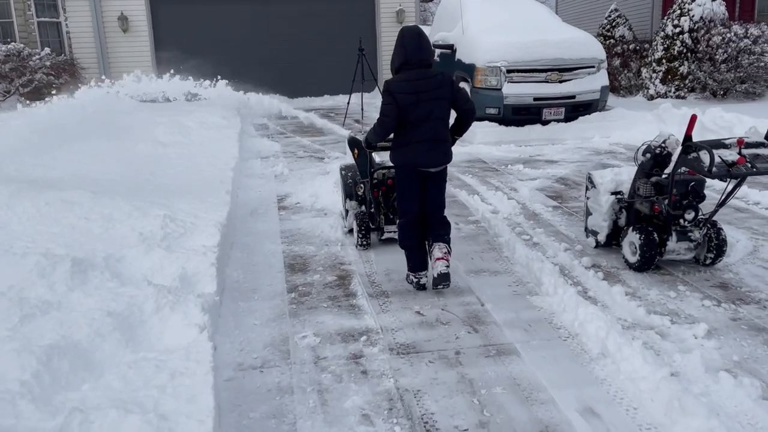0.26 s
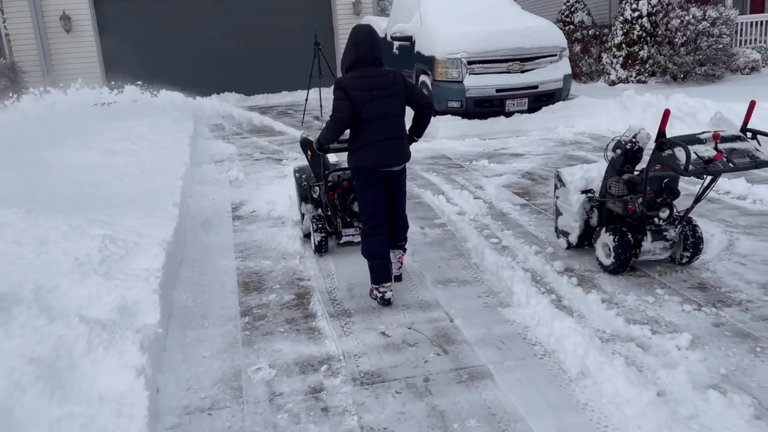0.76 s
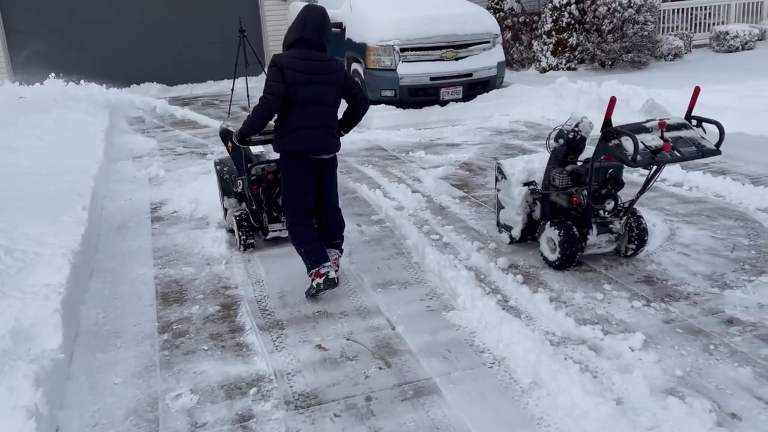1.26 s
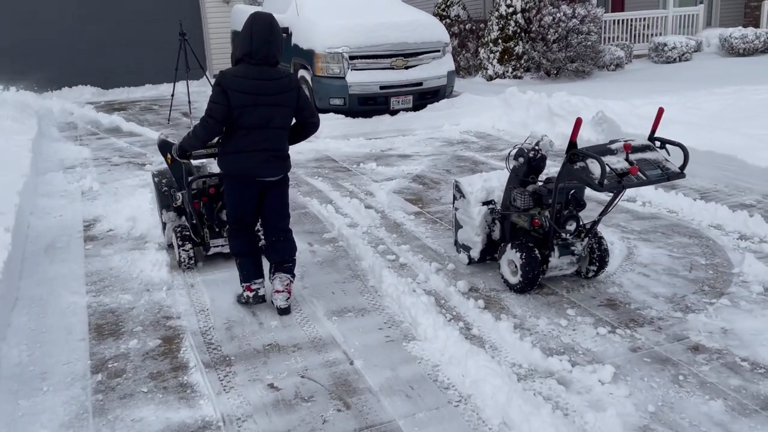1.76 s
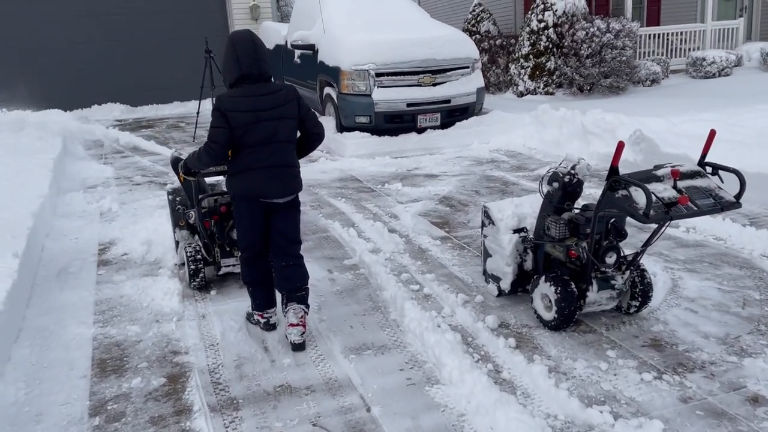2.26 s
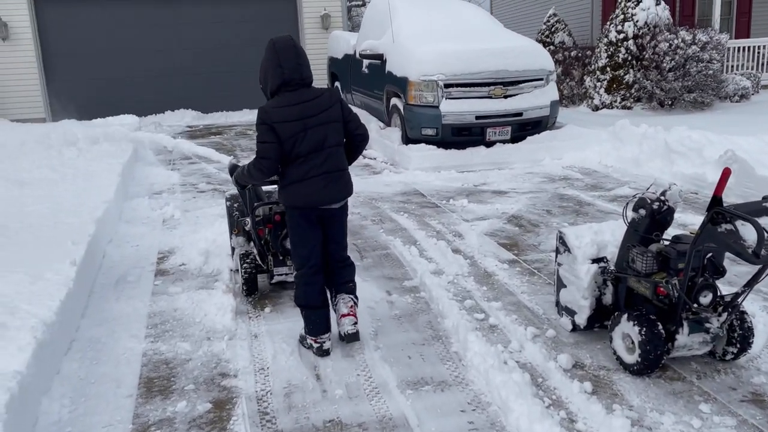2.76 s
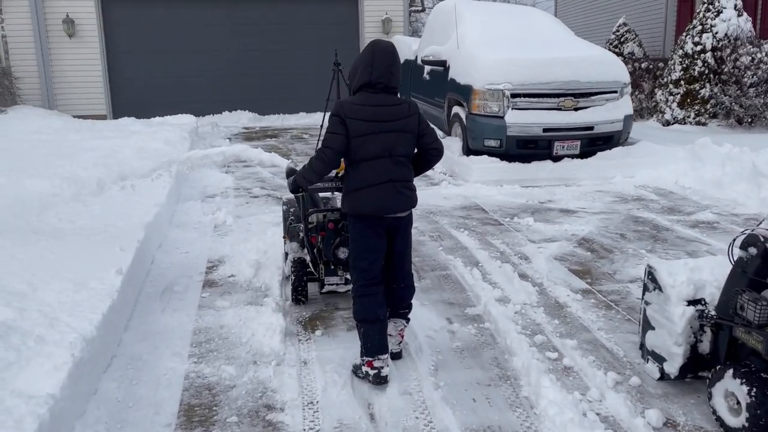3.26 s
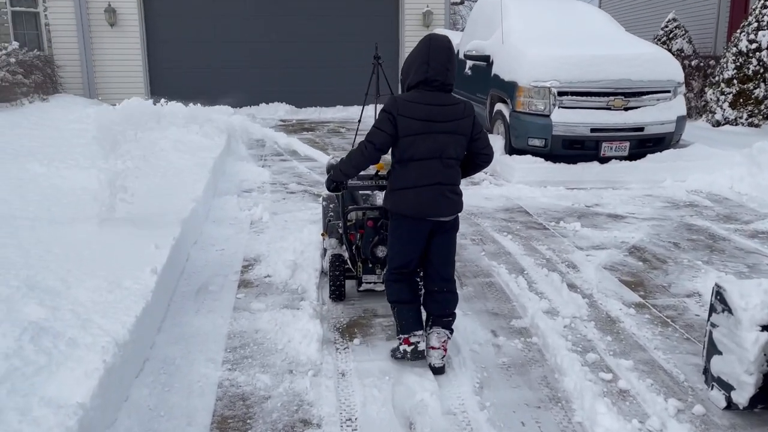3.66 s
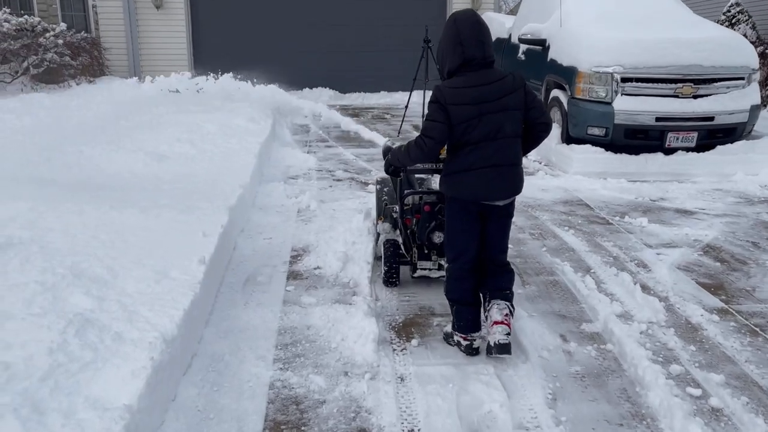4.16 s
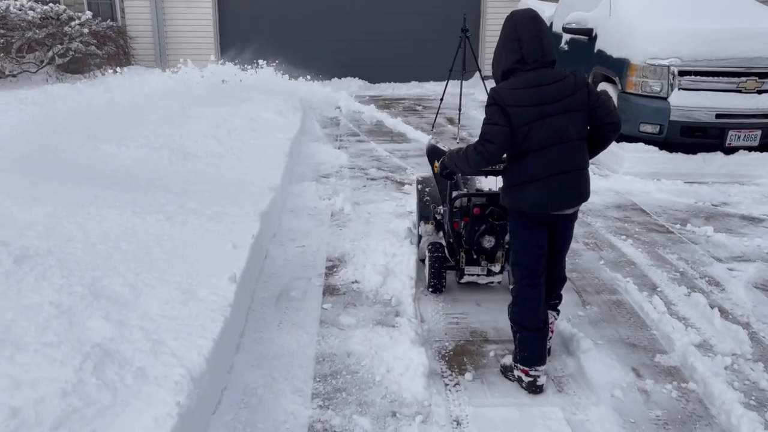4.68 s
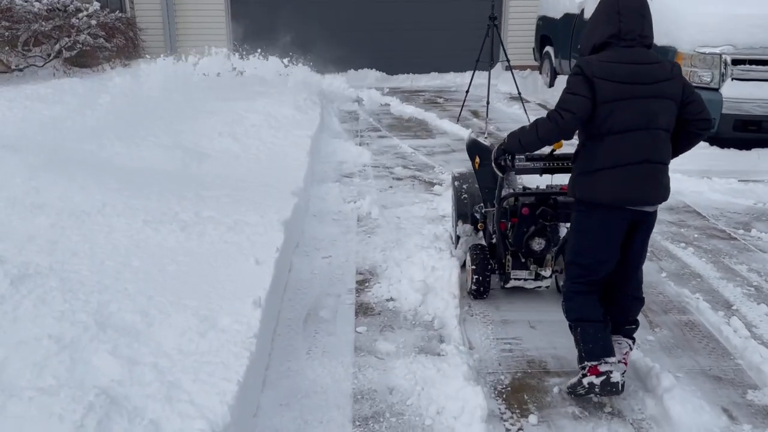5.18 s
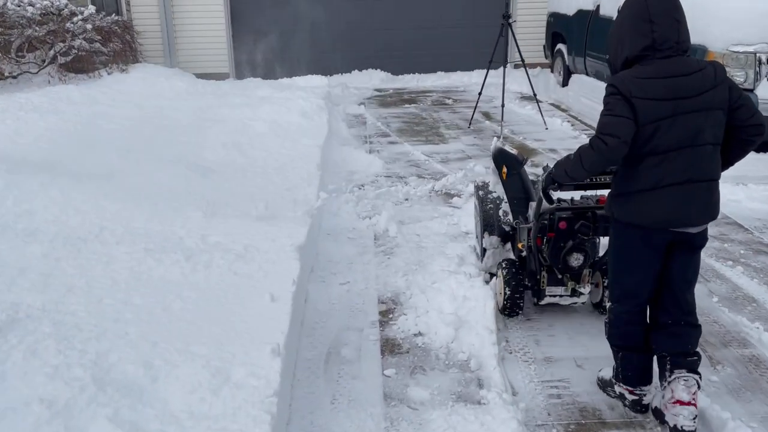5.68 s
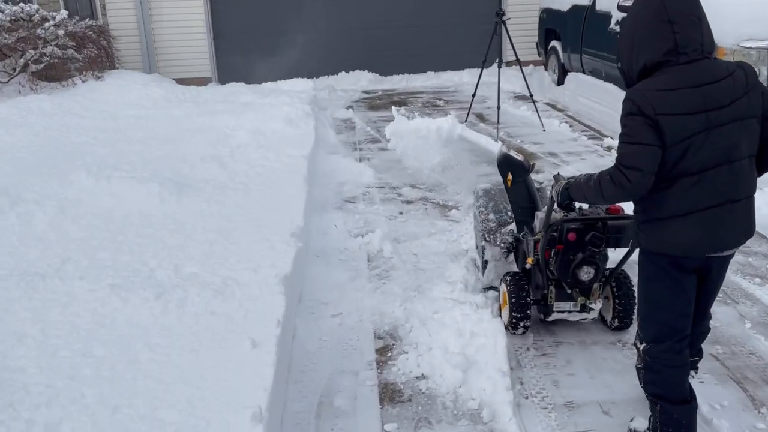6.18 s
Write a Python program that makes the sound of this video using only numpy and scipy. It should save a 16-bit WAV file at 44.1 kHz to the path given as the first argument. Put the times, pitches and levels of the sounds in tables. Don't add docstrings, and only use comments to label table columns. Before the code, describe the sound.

Outdoors on a snowy concrete driveway, a single-cylinder snow blower works a few metres ahead of a moving handheld stereo microphone. From 0 s the engine putters at about 28 firings a second: a low buzzing muffler hum over rumble, with rapid metallic rattling, ringing covers and a hissy spit each cycle. A small ping opens it; light high ticking swells around 0.6, 2.1 and 4.5 s. From 1.9 to 3.3 s the housing knocks hollowly on the concrete in a quick run of clanks. Speed rises slightly to 3 s, then dips at 3.5 s and eases. Single clanks come at 4.2 and 4.65 s as the sound turns brighter and closer. It revs up at 5.4 s, then from 5.6 s deep snow chokes it: heavy thumps, a hard clank, irregular misfires and sagging pitch until 6.1 s. Strong regular spits and faint pings follow as it pulls through, still running at 6.4 s.

```python
import sys
import numpy as np
from scipy import signal
from scipy.fft import rfft, irfft
from scipy.io import wavfile
from scipy.ndimage import uniform_filter1d

SR = 44100
rng = np.random.default_rng(int(sys.argv[2]) if len(sys.argv) > 2 else 0)


def store_pcm(level_fs):
    pcm = np.round(np.clip(level_fs, -1, 1) * 32767).astype(np.int16)
    wavfile.write(sys.argv[1], SR, np.atleast_2d(pcm).T)


def boost_factor(decibels):
    exponent = np.asarray(decibels, float) / 20
    return 10 ** exponent


N = 283563
T = np.arange(N) / SR
HZ = np.fft.rfftfreq(N, 1 / SR)
USUAL_RATE = 28.7

# time in seconds, firings per second.
SPEED = [(0.0, 27.7), (0.09, 28.27), (0.7, 28.82), (1.52, 28.4), (2.04, 28.75), (2.77, 29.57),
         (3.07, 29.69), (3.54, 27.63), (3.85, 27.68), (4.28, 28.68), (4.61, 29.07), (5.04, 29.25),
         (5.42, 31.2), (5.64, 30.1), (5.95, 25.2), (6.1, 24.75), (6.22, 26.75), (6.43, 28.2)]
# time in seconds, level in dB.
EFFORT = [(0, -1.5), (.6, .5), (1.3, -0.5), (2.1, 0), (3.0, -0.5), (3.3, -.5), (3.65, -2), (4.0, -2),
          (4.5, 1.07), (5.0, .5), (5.5, 0.5), (5.8, -0.15), (5.97, -2.5), (6.15, -1), (6.43, 1)]
# time in seconds, degree from 0 to 1.
STUMBLE = [(0, .05), (5.58, .08), (5.65, .7), (5.8, .4), (5.95, .85), (6.04, .2), (6.43, .1)]
# order, level in dB, dB per firing/s of speed,
# dB lost per squared firing/s of speed offset.
STRONG_ORDERS = [(2, -27, 1.26, -0.59), (4, -18, 1.24, 0.3743), (5, -23, -0.38, -0.11),
                 (8, -22.5, -0.55, 1.68)]
# order, level in dB.
WEAK_ORDERS = [(1, -49.5), (3, -38), (6, -38), (7, -39), (9, -40), (10, -32), (11, -36), (12, -43)]
# order, level in dB.
COWLING_ORDERS = [(16, -45), (18, -42), (19, -38), (28, -41), (29, -36), (30, -37), (32, -38), (34, -38),
                  (36, -36.5)]
# frequency in Hz, density in dB per Hz.
RUMBLE_COLOUR = [(20, -24), (40, -27.5), (58, -3), (85, 1), (115, -4), (190, 2.5), (330, -7), (450, -28)]
# lower edge in Hz, upper edge in Hz.
PART_BANDS = [(330, 1250), (1250, 2750), (2750, 4500), (4500, 15700)]
# level in dB, share of effort followed, dB gained after the swing.
PART_LEVELS = [(-25.5, 1.36, -0.45), (-28.5, 1.61, 2), (-32.5, 0.31, -4), (-26, 1.44, -0.85)]
PART_REPEATS = [.6, .7, .5, 0]
# place in cycles, decay in cycles,
# level in dB over the steady rattle, scatter in dB.
PART_BLOWS = [
    [(.05, .045, 8, 2), (.22, .05, 1, 3), (.69, .07, 1, 3)],
    [(.02, .06, 2, 2), (.565, .12, 2.5, 2), (.72, .12, 1, 2)],
    [(.02, .12, -1, 2), (.6, .06, 5, 3), (.72, .1, 6.5, 2)],
    [(.95, .17, 2.5, 2), (.38, .1, -1, 2), (.58, .1, 3, 3), (.73, .09, 10, 2.5)],
]
# frequency in Hz, density in dB per Hz.
RATTLE_COLOUR = [(300, -11), (420, -8), (830, -2), (1200, -12.5), (1550, -7.5), (2000, -11.5),
                 (2900, -11.5), (3400, -5.5), (4400, -10), (6400, -13.5), (7500, -10.5), (10000, -7.5),
                 (13000, -43), (15700, -28.5)]
# time in seconds, peak in dB.
MISFIRES = [
    (5.6339, -9),
    (5.6645, -15),
    (5.8421, -16),
    (5.921, -13.5),
    (5.9588, -14),
    (5.9912, -8),
    (6.033, -12.5),
]
# time in seconds, peak in dB.
LABOUR = [(0, -60), (6.045, -60), (6.06, -20), (6.2, -6.5), (6.31, -7), (6.43, -15)]
# time in seconds, peak in dB, frequency in Hz.
PINGS = [
    (0.0568, -15, 3630),
    (6.0731, -17.5, 3490),
    (6.112, -24.5, 3340),
    (6.1908, -17, 3487),
    (6.2644, -23.5, 3500),
    (6.4118, -26, 3530),
]
# middle in seconds, half length in seconds, dB over usual.
TAPPET_SPELLS = [(.62, 0.75, 15.7), (2.1, 0.78, 16.2), (4.55, 0.36, 22)]
# time in seconds, peak in dB, frequency in Hz.
THUMPS = [
    (1.46, -23, 80),
    (2.071, -20.5, 75),
    (5.646, -7.5, 86.05),
    (5.771, -11.5, 79),
    (5.921, -9, 74.4),
]
# time in seconds, peak in dB, ring in Hz, length in seconds.
CLANKS = [(1.91, -18, 765, .03), (2.13, -16, 790, .03), (2.245, -12, 765, .022), (2.375, -12, 740, .028),
          (2.478, -13, 760, .025), (2.515, -14, 740, .025), (2.625, -11, 770, .04), (2.775, -16, 625, .027),
          (2.935, -13, 630, .025), (2.961, -13, 670, .025), (3.103, -12, 790, .033),
          (3.125, -15, 740, .019), (3.255, -15, 805, .024), (4.22, -19, 860, .03), (4.655, -14, 770, .026),
          (5.629, -12.5, 700, .006), (5.661, -12, 600, .006), (5.722, -6, 780, .024),
          (5.883, -14, 820, .018)]
# frequency in Hz, width in Hz, level in dB.
COVER_MODES = [(508, 29, -19), (891.2, 49.6, -7.5), (1026.1, 23.8, -4), (1361.5, 21.4, 0.5), (1555, 35, -2),
               (1686, 72, -8.5)]
# time in seconds, level in dB.
NEARNESS = [(0, 2), (1, -2.5), (4, -2.5), (4.8, 3), (5.8, 4.5), (6.43, 0)]
# time in seconds, frequency in Hz.
ECHO_NOTCH = [(0, 4752), (1, 4650), (1.8, 4013), (2.5, 4520), (3.2, 4740), (4.4, 4910), (5, 3120),
              (5.6, 3030), (6.43, 2996)]
# frequency in Hz, lead of the left in radians.
STEREO_TWIST = [(2000, 0), (2500, .75), (3500, 1.1), (3900, .7), (4650, 2.45), (5340, 5.3), (5700, 6.2),
                (6100, 6.3), (8950, 9.42), (9250, 9.43), (11300, 11.4), (11900, 12.56), (13700, 12.57),
                (15300, 15.7)]
# frequency in Hz, likeness from 0 to 1.
STEREO_LIKENESS = [(30, .9998), (120, .9995), (350, .99), (600, 1), (2000, 1), (3200, .88), (4200, .45),
                   (5200, .85), (5900, .99), (6500, .88), (8900, 1), (9300, 1), (10300, .93), (11400, .7),
                   (12000, .99)]
# frequency in Hz, left over right in dB.
STEREO_LEAN = [(200, .1), (450, .5), (800, 2.8), (1500, .1), (2000, 0), (2450, -1), (3100, 0), (3600, 3),
               (4100, 0), (4900, -1.8), (5500, .7), (6000, 0)]


def evened(x):
    return x / np.sqrt(np.mean(x ** 2) + 1e-20)


def spectrum(points, hz):
    f, value = np.transpose(points)
    return np.interp(np.log(hz + 1), np.log(f + 1), value)


def course(points):
    return np.interp(T, *np.transpose(points))


def speed_offset():
    return course(SPEED) - USUAL_RATE


def add(mix, s, sound):
    part = mix[round(s * SR):][:len(sound)]
    part += sound[:len(part)]


def slow(hz):
    return evened(irfft(rfft(rng.standard_normal(N)) * np.exp(-(HZ / hz) ** 2) * (HZ > 0), N))


def resonate(x, hz, width):
    turn = np.exp(2j * np.pi * np.cumsum(hz * np.ones(len(x))) / SR)
    r = np.exp(-np.pi * width / SR)
    return 2 * (turn * signal.lfilter([1 - r], [1, -r], x / turn)).real


def strikes(turns, place, decay, scatter_db):
    cycle = np.floor(turns - place + 1).astype(int)
    size, late = rng.standard_normal((400, 2)).T
    since = np.maximum((turns - place) % 1 - .009 * (2 + late[cycle]), 0)
    strength = boost_factor(scatter_db * np.clip(size[cycle], -2, 1.6))
    return strength * (1 - np.exp(-since / .004)) * np.exp(-since / decay)


def repeating(turns, hold):
    patterns = rng.standard_normal((80, 1500))
    step = turns / hold
    first, blend = step.astype(int), step % 1 * np.pi / 2
    at = (turns % 1 * patterns.shape[1]).astype(int)
    return patterns[first, at] * np.cos(blend) + patterns[first + 1, at] * np.sin(blend)


def load_db():
    return -3 - 3 * np.clip(speed_offset(), -1.0, 2.2) - 24.0 * course(STUMBLE)


def swing():
    return np.clip((T - 4.65) / .01, 0, 1)


def muffler(turns):
    off, stumble = speed_offset(), course(STUMBLE)
    common_db = .286 * course(EFFORT) - 2.5 * stumble
    fade_db = common_db - .82 * np.maximum(off, 0) ** 2 - 2.1 * swing()
    mistiming = slow(hz=15.3)
    lines = []  # order, dB, waver in dB
    for k, db, slope, bend in STRONG_ORDERS:
        lines.append((k, db + slope * off - bend * off ** 2 + common_db, .6))
    for k, db in WEAK_ORDERS:
        lines.append((k, db + fade_db, 3.0))

    out = np.zeros(N)
    for k, db, waver_db in lines:
        angle = 2 * np.pi * k * (turns - .46 * (k % 2)) + .072 * waver_db * slow(hz=8.6)
        angle += .1496 * k * stumble * mistiming
        level_db = db + (waver_db + 2.5 * stumble) * np.clip(slow(hz=5.34), -2, 1)
        out += np.sqrt(2) * boost_factor(level_db) * np.cos(angle)
    for k, db in COWLING_ORDERS:
        angle = 2 * np.pi * k * (turns - .1) + .5 * slow(hz=3)
        level_db = db + .5 * fade_db - 12 * stumble + 2 * np.clip(slow(hz=2), -2, 1)
        out += np.sqrt(2) * boost_factor(level_db) * np.cos(angle)
    return out


def rumble():
    noise = irfft(rfft(rng.standard_normal(N)) * boost_factor(spectrum(RUMBLE_COLOUR, HZ)) * (HZ < 450), N)
    return boost_factor(-29.5 + .356 * slow(hz=5.1) + 4.07 * course(STUMBLE)) * evened(noise)


def rattle(turns):
    out, load = np.zeros(N), boost_factor(1.5 + .4 * load_db())
    parts = zip(PART_BLOWS, PART_BANDS, PART_REPEATS, PART_LEVELS)
    for blows, (lo, hi), repeats, (db, follow, swing_db) in parts:
        jumps = np.zeros(N)
        for at, decay, blow_db, scatter_db in blows:
            jumps += boost_factor(blow_db) * strikes(turns, at, decay, .6 * scatter_db)
        drive = 1 + load * jumps
        drive = drive / np.sqrt(uniform_filter1d(drive ** 2, size=8000)) * boost_factor(.6 * slow(hz=40))
        share = repeats * (1 - .754 * np.clip(course(STUMBLE), 0, 1))
        noise = np.sqrt(share) * repeating(turns, hold=14)
        noise += np.sqrt(1 - share) * rng.standard_normal(N)
        band = 1 / np.sqrt((1 + (lo / (HZ + 1)) ** 16) * (1 + (HZ / hi) ** 16))
        part = irfft(rfft(drive * noise) * band * boost_factor(spectrum(RATTLE_COLOUR, HZ)), N)
        out += boost_factor(db + follow * course(EFFORT) + swing_db * swing()) * evened(part)
    return out


def firing_knock(turns):
    knock = resonate(np.gradient(np.floor(turns - .11)), 513, 290)
    return boost_factor(-37.5 + 4.7 * swing()) * evened(knock)


def head_clack(turns):
    impacts = rng.standard_normal(N) * strikes(turns, .62, .1, 2.1)
    clack = resonate(resonate(impacts, 3400, 300), 3400, 500)
    return boost_factor(-37.5 + .367 * load_db()) * evened(clack)


def exhaust_spit(turns):
    puffs = boost_factor(-10.5 + .367 * load_db()) * strikes(turns, .6, .084, 1.13)
    pulls = T[1:][np.diff(np.floor(turns - .725)) > 0]
    labour = [(s, np.interp(s, *np.transpose(LABOUR))) for s in pulls]
    t = np.arange(0, .03, 1 / SR)
    for s, db in list(MISFIRES) + labour:
        add(puffs, s, boost_factor(db + 5) * (1 - np.exp(-t / .0004)) * np.exp(-t / .003))
    spit = resonate(resonate(rng.standard_normal(N) * puffs, 8860, 4800), 8860, 4800)
    return signal.sosfilt(signal.butter(3, 10500, fs=SR, output="sos"), spit)


def loose_cover():
    out, t = np.zeros(N), np.arange(0, .25, 1 / SR)
    for s, db, hz in PINGS:
        add(out, s, boost_factor(db) * np.sin(2 * np.pi * hz * t) * (t / .001076) * np.exp(1 - t / .0013))
    return out


def tappet_tick(turns):
    level_db = -50 + sum(db * np.exp(-((T - s) / half) ** 2) for s, half, db in TAPPET_SPELLS)
    gate = uniform_filter1d(strikes(turns, .57, .05, 4.0), size=60)
    return boost_factor(level_db) * evened(np.sin(2 * np.pi * 7100 * T + 3 * slow(hz=40)) * gate)


def frame_thump():
    out, t = np.zeros(N), np.arange(0, .25, 1 / SR)
    for s, db, hz in THUMPS:
        add(out, s - .01, boost_factor(db) * np.sin(2 * np.pi * hz * t) * (t / .0269) * np.exp(1 - t / .01396))
    return out


def housing_clank():
    out, t = np.zeros(N), np.arange(0, .25, 1 / SR)
    for s, db, hz, length in CLANKS:
        gap, again = rng.random(2)
        skips = np.gradient(np.floor(t / (.013 + .004 * gap) + .8)) * (1 + .27 * again)
        grind = .04 * rng.standard_normal(len(t))
        force = (skips + grind) * np.exp(-(t / length) ** 2) * (1 - np.exp(-t / .0013))
        ring = resonate(resonate(force, hz, 70), hz, 350)
        ring += .28 * resonate(resonate(force, 1550, 60), 1500, 500)
        ring += .25 * boost_factor(2 * (db + 6)) * resonate(resonate(force, 1700, 1300), 1700, 1300)
        add(out, s, boost_factor(db + 2) * ring / abs(ring).max())
    return out


def through_air(bright):
    bright = bright + sum(boost_factor(db) * resonate(bright, hz, width) for hz, width, db in COVER_MODES)
    top = irfft(rfft(bright) * (HZ > 11500), N)
    bright = bright + (boost_factor(course(NEARNESS)) - 1) * top
    return bright - .53 * resonate(bright, course(ECHO_NOTCH), 703)


def scene():
    turns = .19 + np.cumsum(course(SPEED)) / SR
    bright = rattle(turns) + firing_knock(turns) + head_clack(turns)
    bright += exhaust_spit(turns) + tappet_tick(turns)
    mono = muffler(turns) + rumble() + through_air(bright)
    mono += loose_cover() + frame_thump() + housing_clank()
    return np.array([mono, mono])


def band_limit(x):
    return signal.sosfilt(signal.butter(12, 15730, fs=SR, output="sos"), x)


def record(dry):
    blur = evened(uniform_filter1d(rng.standard_normal(len(HZ)), size=60))
    spread = np.sqrt(-2 * np.log(np.clip(spectrum(STEREO_LIKENESS, HZ), .1, 1)))
    twist = np.exp(-1j * (np.interp(HZ, *np.transpose(STEREO_TWIST)) + spread * blur))
    lean = boost_factor(spectrum(STEREO_LEAN, HZ) / 2)
    left, right = rfft(dry) * (HZ < 15750)
    mix = irfft([left * lean, right * twist / lean], N)
    return band_limit(mix)


dry = scene()
out = record(dry)
store_pcm(out)
```